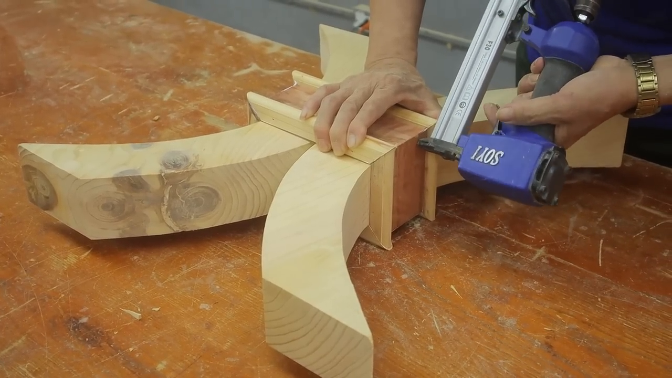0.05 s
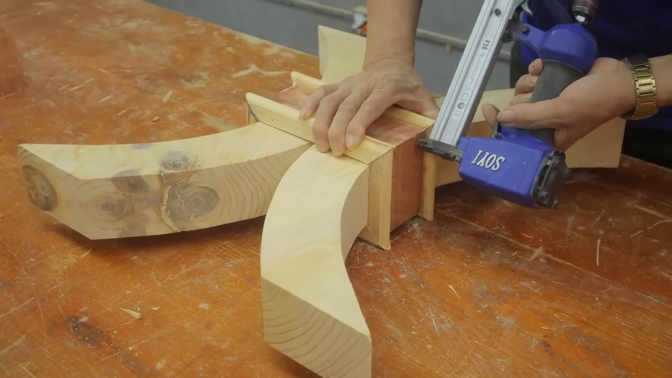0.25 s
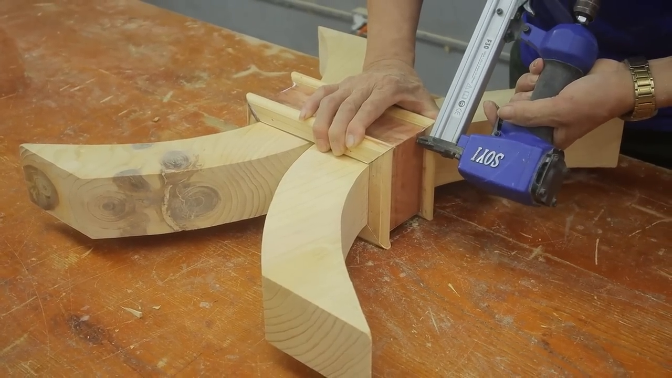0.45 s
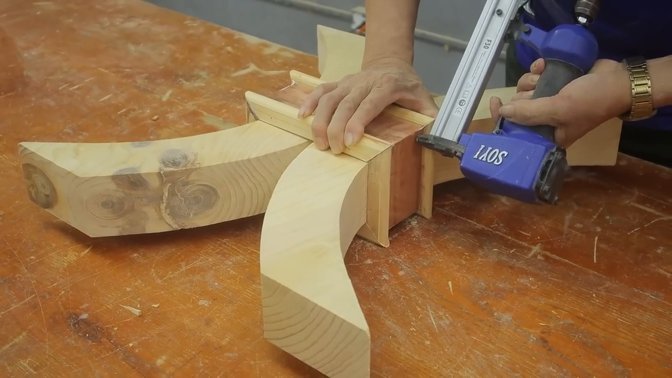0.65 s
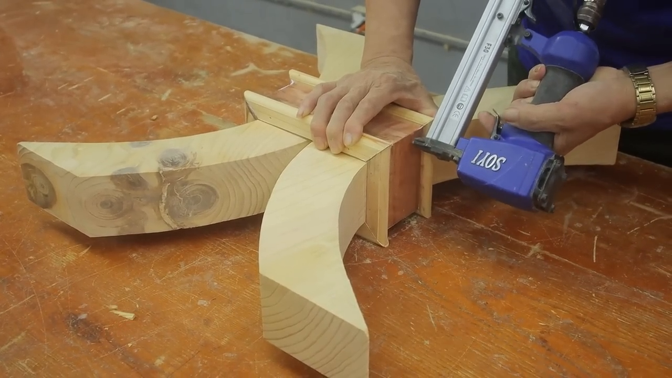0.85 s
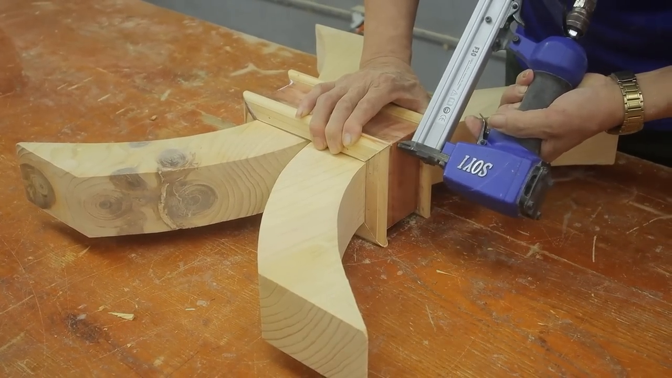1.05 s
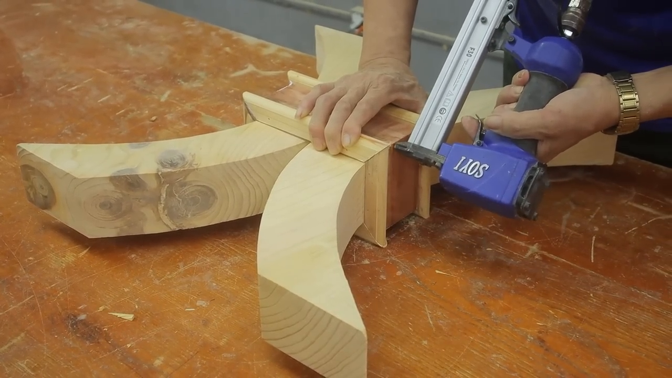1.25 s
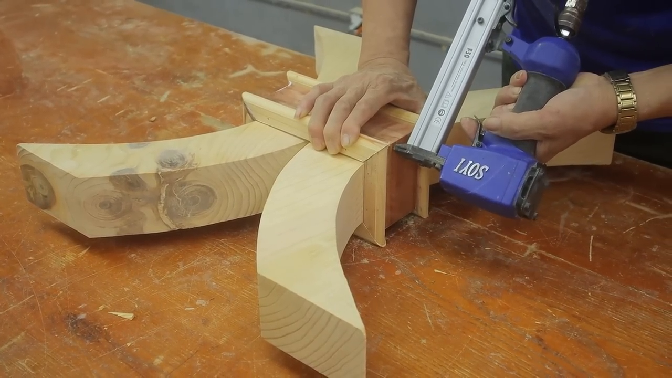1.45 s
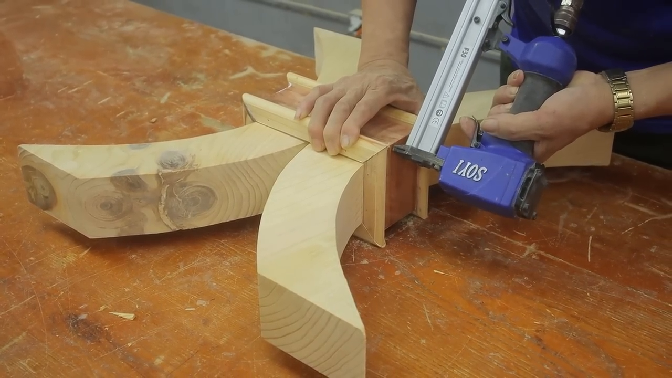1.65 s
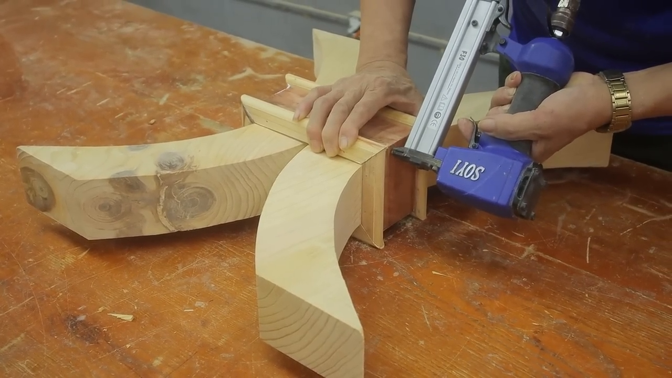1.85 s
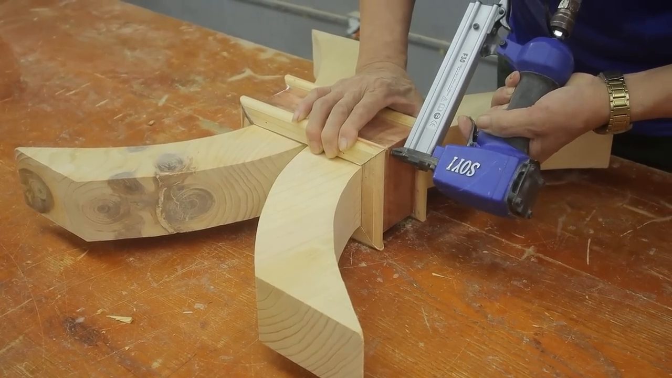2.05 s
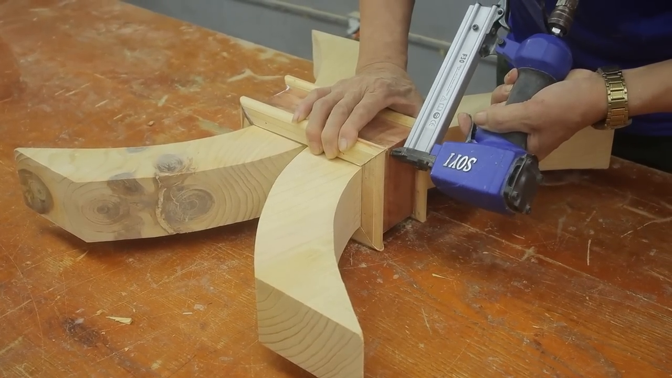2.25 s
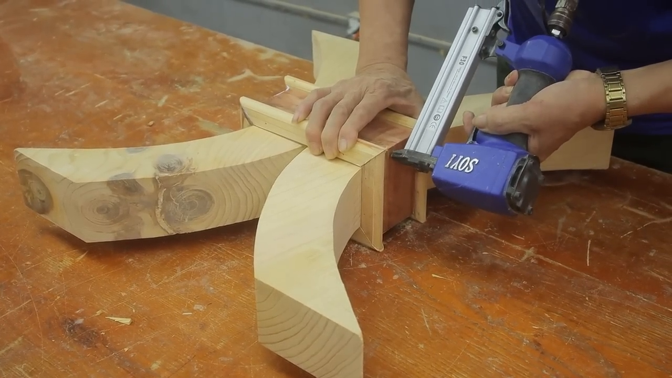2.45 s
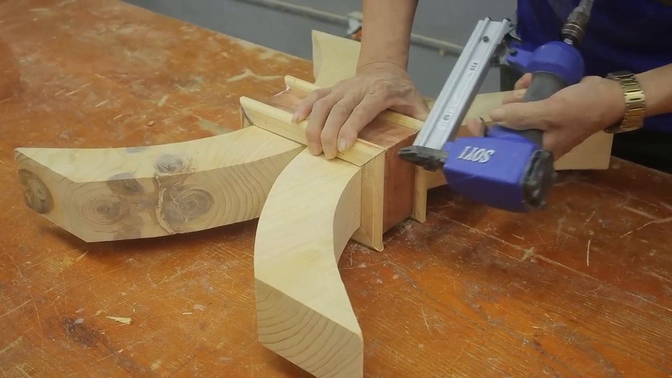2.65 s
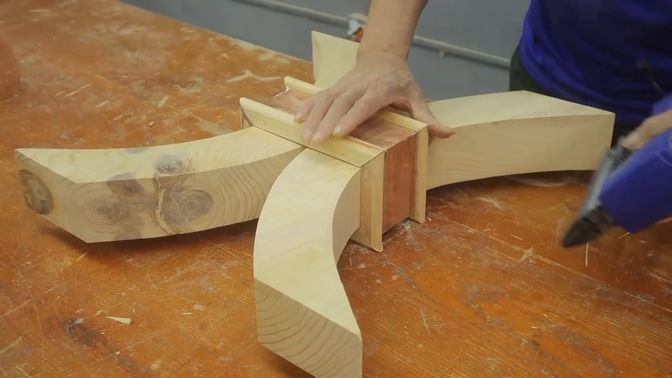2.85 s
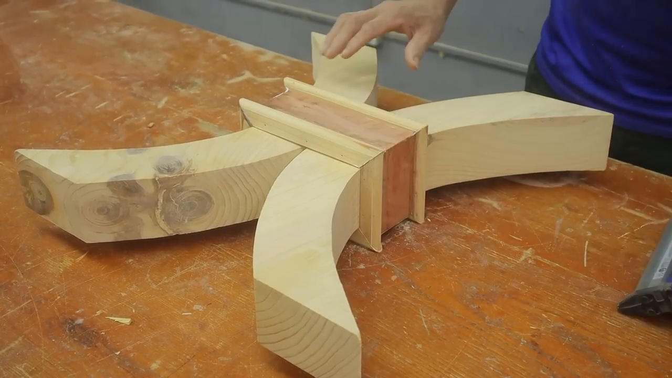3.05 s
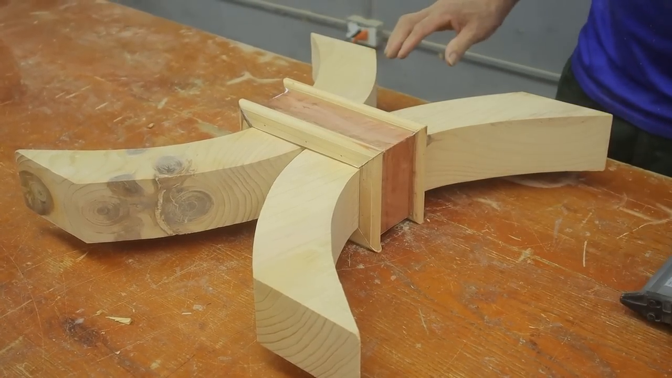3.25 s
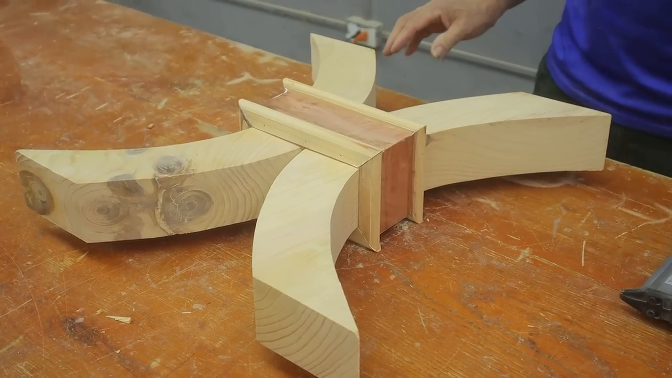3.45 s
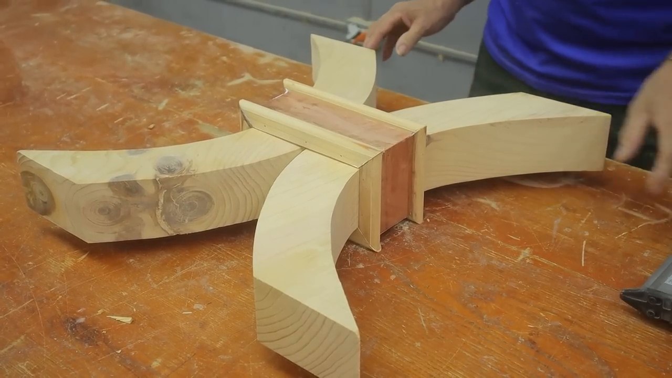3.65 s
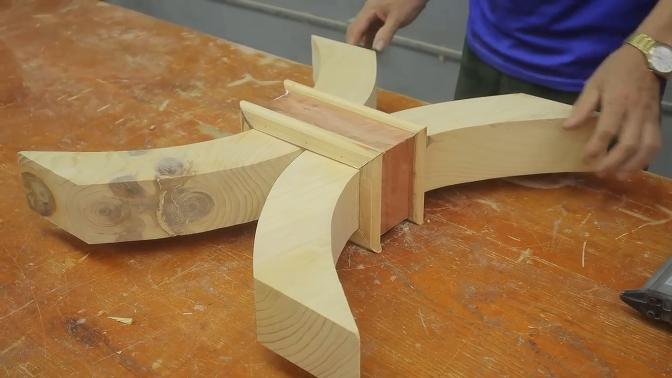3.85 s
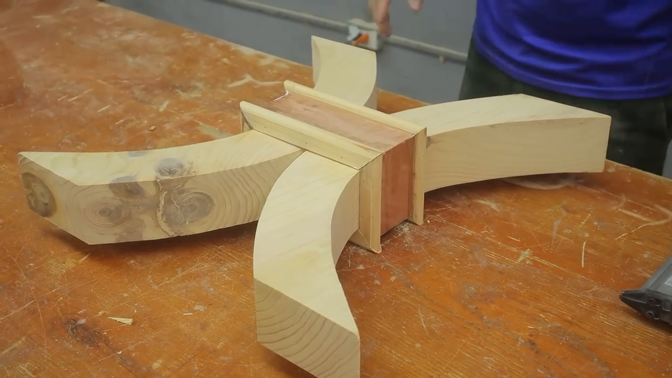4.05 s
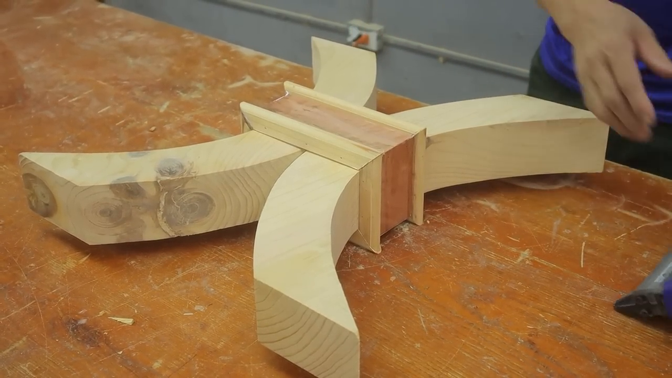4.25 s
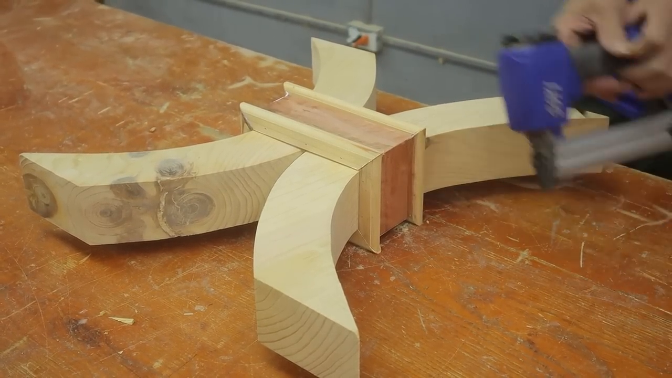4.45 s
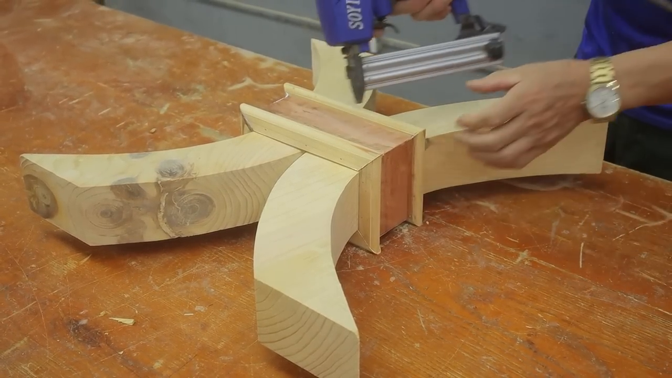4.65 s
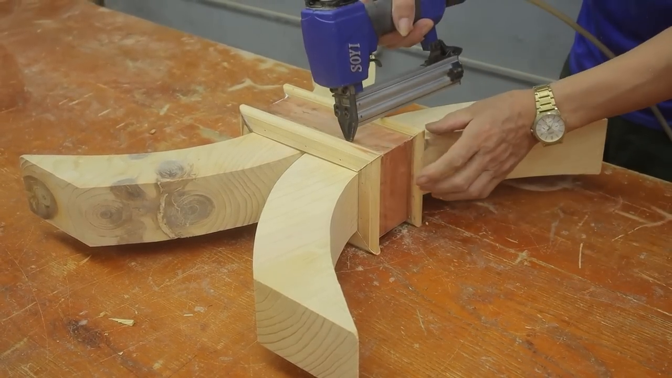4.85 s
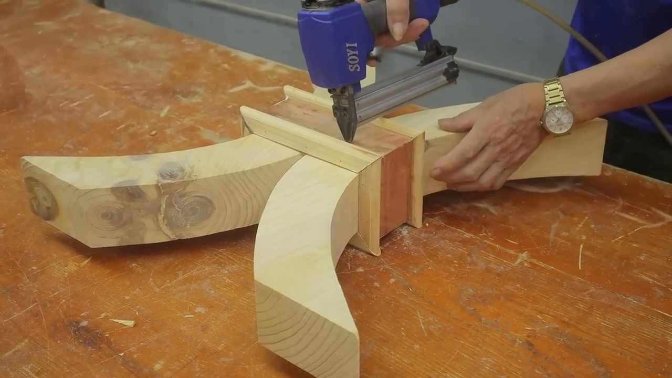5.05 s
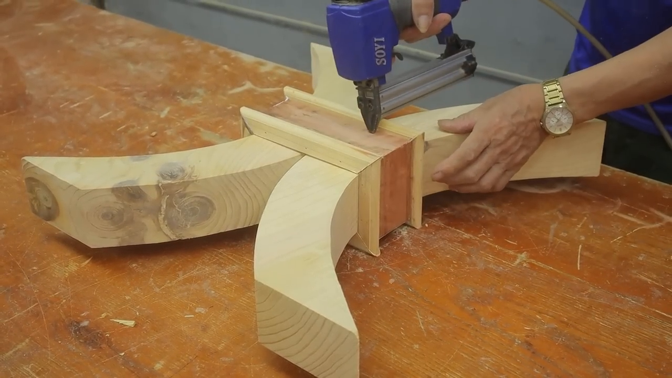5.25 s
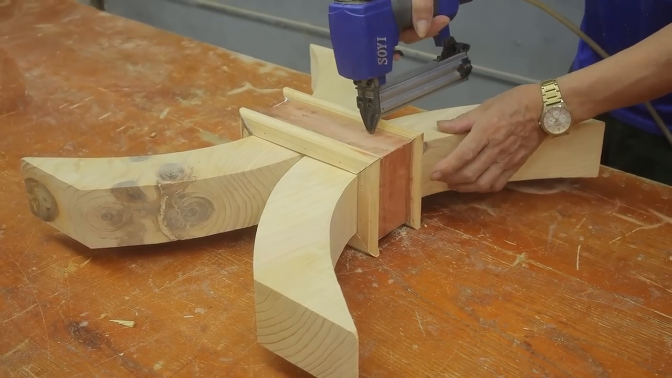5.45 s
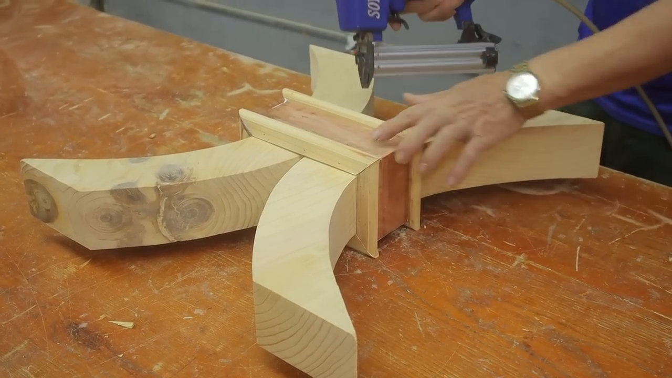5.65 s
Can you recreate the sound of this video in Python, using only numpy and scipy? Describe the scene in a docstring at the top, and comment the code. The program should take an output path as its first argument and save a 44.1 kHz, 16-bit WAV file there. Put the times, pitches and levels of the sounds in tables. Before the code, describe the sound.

Two barely audible high squeaks precede a hard nail gun shot into wood, with a low thud just after it and a short hiss and metallic clack. After a quiet gap comes another shot and release. Dull knocks and light metal ticks mark the tool being put down and lifted. Two fuller shots close together end it, close-miked, slightly right, with short diffuse room reverberation.

```python
"""Air noise and the faint, wavering hum of a distant machine fill a small workshop throughout: shaped random noise.
After two faint squeaks a pneumatic nailer pins trim to a wooden stand on a workbench, two shots from the side:
shaped pulses, dense reflections and ringing modes; a low thud (band noise) follows the first. After each shot the
trigger is let go: a puff, hissing air, then thump and clack. Between shots come a low rumble and a rustle, and the
gun is laid on the bench and taken up again: dulled knocks and metal ticks. Two quicker shots from above then drive
the bench harder. The room answers with short diffuse reverberation."""
import sys
import numpy as np
from scipy import signal
from scipy.fft import rfft, irfft, next_fast_len
from scipy.io import wavfile

SR = 44100
rng = np.random.default_rng(int(sys.argv[2]) if len(sys.argv) > 2 else 0)


def transcribe(u):
    """Save the signal u as a 16-bit wav file named by the first command-line argument.

    u: samples, shape (n,) or (channels, n), limited to [-1, 1]; the rate is SR.
    q: integer samples, one column per channel.
    """
    v = np.clip(np.atleast_2d(u).T, -1, 1)
    q = np.round(v * 32767).astype(np.int16)
    wavfile.write(sys.argv[1], SR, q)


N = 251811
SIZE = 16384   # samples in one short sound
AGE = np.arange(SIZE) / SR   # seconds since its start
HZ = np.fft.rfftfreq(SIZE, 1 / SR)
CUTOFF_HZ = 16200

# The nailer fires. Each row: start in seconds, level in dB, ring of the nailed piece in Hz, its level in dB
# before random variation, aim from 0 (from the side) to 1 (from above).
NAIL_SHOTS = [(0.6387, -1, 1472, -19, 0.035), (2.5005, -1.53, 1708, -33, 0), (5.0637, -1, 1297, -26, 0.95),
              (5.4766, -2.3, 1328, -20.5, 1)]
# Modes of the bench top. Each row: pitch in Hz, level in dB before variation and blow level,
# t60 in seconds before extra damping.
BENCH_MODES = [(92.3, -55.5, 0.13), (140, -54, 0.13), (186.4, -42, 0.42), (219.6, -46, .2),
               (279.4, -42.5, 0.14), (473.7, -38, 0.13), (486, -41, 0.24)]
# Metal modes of the gun. Each row: pitch in Hz, level in dB before variation and blow level,
# t60 in seconds before extra damping.
GUN_MODES = [(1850, -50.5, 0.12), (1880, -55, 0.16), (2010, -56.5, 0.08), (2170, -40.5, 0.053),
             (2500, -44.5, 0.1), (2893, -55.5, 1), (4025, -44, 0.35), (4136, -48, .24), (4050, -48.5, 0.22),
             (4696, -65.5, .22)]


def from_db(db):
    """Decibels to gain."""
    return 10 ** (np.asarray(db) / 20)


def rms_one(x):
    """Scale to an rms of one."""
    return x / np.sqrt(np.mean(x ** 2) + 1e-30)


def at_hz(points, hz):
    """Read a table on a log-frequency axis."""
    points = np.array(points)
    return np.interp(np.log(hz + 1e-9), np.log(points[:, 0]), points[:, 1])


def between(ends, share):
    """Blend from the first value to the second as share goes from 0 to 1."""
    return ends[0] + (ends[1] - ends[0]) * np.clip(share, 0, 1)


def dying(t60):
    """An envelope that falls 60 dB in t60 seconds."""
    return np.exp(-np.log(1000) * AGE / t60)


def bump(hz, centre_hz, octaves):
    """A bell of height one on a log-frequency axis."""
    return np.exp(-.5 * (np.log2((hz + 1) / centre_hz) / octaves) ** 2)


def add(track, s, sound):
    """Mix a sound into a track at time s."""
    start = int(round(s * SR))
    track[start:start + len(sound)] += sound[:N - start]


def blow(spectrum, lag_hz=3000, lag_q=1, dull_hz=np.inf, stand_db=0):
    """A causal pulse with this spectrum, held back a little around lag_hz by the body; soft contact loses its top."""
    gain = from_db(at_hz(spectrum, HZ)) / np.hypot(1, (HZ / dull_hz) ** 2)
    # the broad resonance of the stand
    gain = gain * from_db(stand_db * bump(HZ, centre_hz=1937, octaves=0.49))
    # folding the cepstrum gives minimum phase: the energy comes as early as it can
    cepstrum = irfft(np.log(gain))
    cepstrum[1:SIZE // 2] *= 2
    cepstrum[SIZE // 2 + 1:] = 0
    body = 1 - (HZ / lag_hz) ** 2 + 1j * HZ / (lag_hz * lag_q)
    all_pass = np.conj(body) / body   # delays without changing the spectrum
    pulse = irfft(np.exp(rfft(cepstrum)) * all_pass)
    return pulse * np.exp(-(AGE / .03) ** 2)


def ring(modes, vary_db, rise_s, damping=1):
    """Struck modes build up, then die away, with new strengths on every blow."""
    total = 0
    for hz, db, t60 in modes:
        lost_db = 60 * rise_s / t60   # makes up for the decay during the rise
        strength = from_db(db + vary_db * rng.normal() + lost_db)
        total = total + strength * dying(t60 / damping) * np.sin(2 * np.pi * hz * AGE)
    swell = (1 - np.exp(-AGE / rise_s)) ** 2
    return swell * total


def scatter(pulse, t60):
    """The dense reflections of a pulse inside and around the workpiece: noise that swells and dies."""
    echoes = rng.standard_normal(SIZE) * (dying(t60) - dying(t60 / 10))
    return signal.fftconvolve(pulse, echoes / np.linalg.norm(echoes))[:SIZE]


def push(centre_ms, width_ms):
    """A brief displacement of air: one swing of pressure, up then down, of height one."""
    u = (1000 * AGE - centre_ms) / width_ms
    return -u * np.exp(.5 - .5 * u ** 2)


def noise(gain):
    """A short stretch of noise shaped by this gain per frequency; rms one."""
    return rms_one(irfft(rfft(rng.standard_normal(SIZE)) * gain))


def diffuse(size):
    """Frequencies and stereo spectrum of white noise from all sides: the two microphones differ more in the treble."""
    # Likeness of left and right. Each row: frequency in Hz, correlation from -1 to 1 before a slight clip.
    likeness = [(200, 1), (1000, 0.95), (2200, 0.78), (4000, 0.4), (6000, -0.23), (8500, -.4),
                (11500, -.66)]
    hz = np.fft.rfftfreq(size, 1 / SR)
    mid, side = rfft(rng.standard_normal((2, size)))
    alike = np.clip(at_hz(likeness, hz), -.999, .999)
    common = np.sqrt((1 + alike) / 2) * mid
    opposed = np.sqrt((1 - alike) / 2) * side
    return hz, common + opposed * [[1], [-1]]


def panned(side, hz):
    """Left and right gains from a table of level differences."""
    return from_db(at_hz(side, hz) * [[.5], [-.5]])


def background(air_db=-68.5):
    """Steady air noise with the narrow, wavering lines of a distant machine, both cut from diffuse noise."""
    # Colour of the air noise. Each row: frequency in Hz, relative level in dB per Hz.
    air_colour = [(25, -9), (50, -2), (100, -11.5), (180, -7), (260, -10.5), (500, -11), (1000, -16),
                  (1600, -13), (2800, -15.5), (4200, -19), (6300, -25.5), (8000, -31.5), (10000, -38),
                  (14000, -55)]
    # Stereo lean of the air noise. Each row: frequency in Hz, left minus right in dB.
    air_lean = [(400, 0.3), (1000, -3), (2200, -5), (6000, -4.5), (11000, 0.5)]
    # Machine hum. Each row: line in Hz, level in dB, half width in Hz where the gain has halved.
    hum_lines = [(232, -88.5, 10), (429.8, -91.5, 10), (637, -86, 8), (794, -79, 6.5)]
    size = next_fast_len(N)
    hz, field = diffuse(size)
    coloured = field * from_db(at_hz(air_colour, hz)) * panned(air_lean, hz)
    total = from_db(air_db) * rms_one(irfft(coloured, size))
    for line_hz, db, width_hz in hum_lines:
        line = field / (1 + ((hz - line_hz) / width_hz) ** 2)
        total = total + from_db(db) * rms_one(irfft(line, size))
    return total[:, :N]


def handling(rattle_db=-0.5, room_db=7.0):
    """Dull knocks swell the modes of boards and bench, loose metal ticks; bands of noise squeak, rumble and rustle."""
    # Gun and hands bump the wood. Each row: start in seconds, level in dB, dull above this Hz,
    # place from 0 (bench boards) to 1 (stand).
    bumps = [(1.038, -28.5, 400, 0.69), (1.541, -23.5, 1180, 0.42), (3.102, -1, 1400, 0.36),
             (3.1915, -4.5, 1290, 0.16), (3.2705, 2, 2600, 0), (3.435, -18.5, 690, 0.28),
             (4.2840, -0.5, 1400, 0), (4.9011, -16.5, 2400, 0.93)]
    # Light metal ticks of the gun. Each row: start in seconds, level in dB.
    metal_ticks = [(3.102, -23), (3.184, -22.5), (4.2865, -23.5), (4.9025, -36), (5.035, -31)]
    # Faint squeaks, a low thud after the first shot, a low rumble and a rustle. Each row: start in seconds,
    # length in seconds, level in dB before the swell, centre in Hz, width in octaves.
    faint_noises = [(0.41, .07, -90, 8800, .08), (0.54, .07, -87, 8800, .07), (0.66, .09, -52, 48, .4),
                    (1.68, .06, -51, 45, .8), (2.135, .07, -72, 3200, .9)]
    # Modes of the boards. Each row: pitch in Hz, level in dB before variation and blow level,
    # t60 in seconds before extra damping.
    board_modes = [(304.4, -48.5, 0.2), (637, -32.5, 0.13), (699, -41.5, 0.2), (1400, -38.5, 0.041),
                   (1550, -59, 0.32), (2170, -60.5, 0.15), (2600, -60, 0.075)]
    # Spectrum of a knock on wood. Each row: frequency in Hz, level in dB.
    knock_spectrum = [(50, -19), (110, -15.5), (280, 0.5), (600, 5), (1000, -3.5), (1600, -2.5),
                      (2500, -10.5), (3800, -19), (12000, -24)]
    # Spectrum of a metal tick. Each row: frequency in Hz, level in dB.
    tick_spectrum = [(200, -6), (1500, -6), (3000, -1.5), (5500, -5), (8000, -17), (11500, -23),
                     (16000, -24)]
    # How far a knock sets the boards ringing: dB on the bench boards, dB on the stand, relative to the knock.
    board_drive_db = (1, -23.5)
    # How far a knock sets the bench ringing: dB on the bench boards, dB on the stand, relative to the knock.
    bench_drive_db = (-17, 10.5)

    contact, body = np.zeros((2, N))
    for s, db, dull_hz, place in bumps:
        knock = from_db(db) * blow(knock_spectrum, lag_hz=895, lag_q=2.0, dull_hz=dull_hz)
        boards = ring(board_modes, vary_db=1.0, rise_s=0.016, damping=1.09)
        bench = ring(BENCH_MODES, vary_db=5.5, rise_s=0.0028, damping=1.25)
        add(contact, s, knock)
        add(body, s, from_db(rattle_db) * scatter(knock, t60=0.065))
        add(body, s, from_db(db + between(board_drive_db, place)) * boards)
        add(body, s, from_db(db + between(bench_drive_db, place)) * bench)
    for s, db in metal_ticks:
        tick = from_db(db) * blow(tick_spectrum, lag_hz=4500, lag_q=3)
        add(contact, s, tick)
        add(body, s, scatter(tick, t60=0.057))
    for s, length_s, db, hz, octaves in faint_noises:
        swell = np.sin(np.pi * np.minimum(AGE / length_s, 1))
        add(contact, s, from_db(db) * swell * noise(bump(HZ, hz, octaves)))
    return contact + body, from_db(room_db) * contact


def releases(hiss_db=-27.0, puff_db=-28, clack_db=0.36, gun_db=-7.0, rattle_db=-3.5, room_db=-1.0,
             piston_home_ms=9.0, clack_lead_ms=0.67, open_s=0.00045, close_s=0.0025):
    """The valve opens with a puff, air hisses while the piston flies back, and it lands with a thump and a clack."""
    # The trigger is let go after each shot. Each row: start in seconds, level in dB.
    trigger_releases = [(0.8155, 0.05), (2.6682, .5), (5.1425, 0), (5.5611, -.3)]
    # Spectrum of the piston's clack. Each row: frequency in Hz, level in dB.
    clack_spectrum = [(100, -13.5), (600, 0), (1050, -2), (1500, 7.5), (2050, 7.5), (3000, -7.5),
                      (3450, -2.5), (3950, 9), (4500, 2), (5500, -4), (16000, -16)]
    # Colour of the escaping air. Each row: frequency in Hz, relative level in dB per Hz.
    exhaust_colour = [(100, -17), (1000, 0.5), (3000, -9.5), (4000, -3), (6500, -0.5), (8500, -2.5),
                      (11500, 2.5), (16000, -2)]
    # How far the returning piston drives the bench: dB from the side, dB from above.
    bench_drive_db = (-3, 4.5)
    # Thump of the returning piston: dB from the side, dB from above.
    thump_db = (-14, -17)

    air, body = np.zeros((2, N))
    clack = from_db(clack_db) * blow(clack_spectrum, lag_hz=2600, lag_q=4.7)
    home_s = (piston_home_ms - clack_lead_ms) / 1000   # the clack starts just ahead of the thump's centre
    opening = 1 - np.exp(-(AGE / open_s) ** 2)
    closing = np.exp(-np.maximum(AGE - home_s, 0) / close_s)
    flow = opening * closing * dying(0.14)
    puff = -from_db(puff_db) * push(centre_ms=0.98, width_ms=0.85)
    hiss_gain = from_db(at_hz(exhaust_colour, HZ)) * (HZ < CUTOFF_HZ)
    for (s, db), shot in zip(trigger_releases, NAIL_SHOTS):
        aim = shot[-1]
        hiss = from_db(hiss_db) * flow * noise(hiss_gain)
        thump = from_db(between(thump_db, aim)) * push(piston_home_ms, width_ms=0.38)
        add(air, s, from_db(db) * (hiss + puff + thump))
        add(air, s + home_s, from_db(db) * clack)
        rattle = from_db(rattle_db) * scatter(clack, t60=.06)
        gun = from_db(gun_db) * ring(GUN_MODES, vary_db=0.5, rise_s=0.0013, damping=1.6)
        bench = ring(BENCH_MODES, vary_db=4.0, rise_s=0.01, damping=1.4)
        bench = from_db(between(bench_drive_db, aim)) * bench
        add(body, s + home_s, from_db(db) * (rattle + gun + bench))
    return air + body, from_db(room_db) * air


def shots(crack_db=-1.0, tear_db=-2.5, rattle_db=-2.5, gun_db=-7.5, piece_t60=0.045, shove_db=-33, hum_db=4.5,
          blast_db=0.55):
    """The driver cracks the nail into the wood; piece, gun and bench ring, and the stand radiates into the room."""
    # Spectrum of the crack heard close by. Each row: frequency in Hz, level in dB.
    crack_spectrum = [(50, -20.5), (120, -8), (220, 7), (450, 9.5), (640, 15), (850, -1), (1100, -1.5),
                      (1500, 11.5), (2400, 11), (3300, 4.5), (4300, 13.5), (7800, -5.5), (11000, -2.5),
                      (16000, -18)]
    # Spectrum of the blast sent into the room. Each row: frequency in Hz, level in dB.
    blast_spectrum = [(60, -15), (200, 10.5), (450, 11.5), (650, 15.5), (1000, 6), (1600, 14), (2500, 14.5),
                      (3300, 11), (4200, 8.5), (5300, 7), (7000, -1.5), (10500, -3.5), (16000, -14.5)]
    # How far a shot drives the bench: dB from the side, dB from above.
    bench_drive_db = (-20, -2.5)
    # How far a shot drives the broad resonance of the stand: dB from the side, dB from above.
    stand_drive_db = (-2, 4)

    near, far = np.zeros((2, N))
    for s, db, piece_hz, piece_db, aim in NAIL_SHOTS:
        stand_db = between(stand_drive_db, aim)
        crack = blow(crack_spectrum, lag_hz=3340, lag_q=1.3, stand_db=stand_db)
        dull_crack = blow(crack_spectrum, dull_hz=3200, stand_db=stand_db)
        tear = from_db(tear_db) * scatter(crack, t60=0.0085)
        rattle = from_db(rattle_db) * scatter(dull_crack, t60=0.065)
        add(near, s, from_db(db) * (from_db(crack_db) * crack + tear + rattle))
        add(near, s, ring([(piece_hz, piece_db, piece_t60)], vary_db=2.5, rise_s=0.0012))
        add(near, s, from_db(gun_db) * ring(GUN_MODES, vary_db=2.5, rise_s=.001))
        # the shot shoves the bench top down and sets it humming, far more so from above
        hum = from_db(hum_db) * ring(BENCH_MODES, vary_db=1.5, rise_s=0.0072, damping=1.0)
        shove = -from_db(shove_db) * push(centre_ms=1.8, width_ms=0.81)
        add(near, s, from_db(between(bench_drive_db, aim)) * (hum + shove))
        add(far, s, from_db(db + blast_db) * blow(blast_spectrum, stand_db=stand_db))
    return near, far


def workshop(dry, first_s=0.0083, build_s=0.0013):
    """Diffuse reflections swell within milliseconds; each half octave dies at its own rate."""
    # Strength of the reverberation. Each row: frequency in Hz, level in dB.
    reverb_db = [(90, -22.5), (200, -11.5), (450, -16.5), (1000, -9), (2200, -7.5), (4500, -7),
                 (10000, -7.5), (16000, -8)]
    # Decay of the reverberation. Each row: frequency in Hz, t60 in seconds.
    reverb_t60 = [(100, 0.34), (260, 0.41), (700, .31), (1840, 0.37), (4850, 0.28), (12800, 0.24)]
    hz, field = diffuse(SIZE)
    band = np.round(2 * np.log2(np.maximum(hz, 60)))   # half-octave number of each frequency
    onset = 1 - np.exp(-np.maximum(AGE - first_s, 0) / build_s)
    response = 0
    for k in np.unique(band):
        centre_hz = 2 ** (k / 2)
        tail = irfft(field * (band == k)) * onset * dying(at_hz(reverb_t60, centre_hz))
        share = np.sqrt(np.mean(band == k) / SIZE)   # wide bands carry more energy
        response = response + from_db(at_hz(reverb_db, centre_hz)) * rms_one(tail) * share
    return signal.oaconvolve(dry[None], response, axes=1)[:, :N]


def direct(dry):
    """The gun is a little to the right: its treble mostly reaches the left microphone later and weaker."""
    # Stereo lean of the near sound. Each row: frequency in Hz, left minus right in dB.
    near_lean = [(200, 0), (500, -.3), (1000, -.6), (2200, -1.3), (4000, -2), (6000, -5), (8500, 1.2),
                 (11500, -1), (14500, -4.5)]
    # Phase between the microphones. Each row: frequency in Hz, radians by which left lags.
    left_lag = [(100, 0), (2000, -.13), (4000, .2), (6000, .7), (8500, .8), (11500, 2.2), (14500, 2.6)]
    size = next_fast_len(N + SIZE)
    hz = np.fft.rfftfreq(size, 1 / SR)
    lag = np.exp(1j * at_hz(left_lag, hz) * [[-.5], [.5]])
    return irfft(rfft(dry, size) * panned(near_lean, hz) * lag, size)[:, :N]


def scene():
    """Each source is heard close by with the ringing of its parts; its blows also fill the room."""
    sources = [shots(), releases(), handling()]
    close = direct(sum(near for near, far in sources))
    room = sum(workshop(far) for near, far in sources)
    return close + room + background()


def record(dry, top=0.46, low_cut_hz=95):
    """The microphone thins the deep bass, the highest peaks are rounded towards top and the treble is cut."""
    low_cut = signal.butter(2, low_cut_hz, "high", fs=SR, output="sos")
    thin = signal.sosfilt(low_cut, dry)
    rounded = top * np.tanh(thin / top)
    high_cut = signal.ellip(10, .1, 80, CUTOFF_HZ, fs=SR, output="sos")
    return signal.sosfilt(high_cut, rounded)


dry = scene()
out = record(dry)
transcribe(out)
```